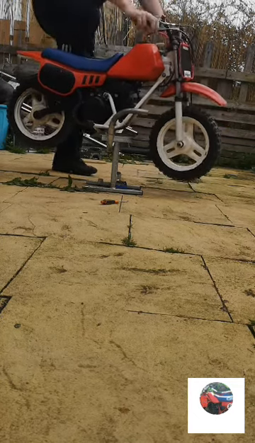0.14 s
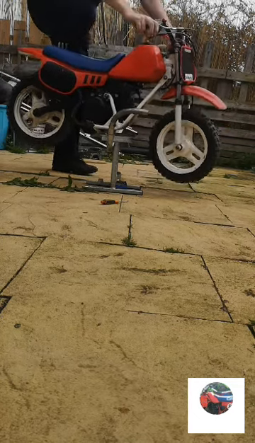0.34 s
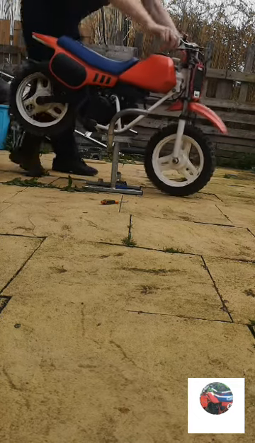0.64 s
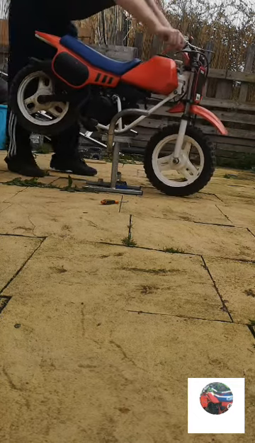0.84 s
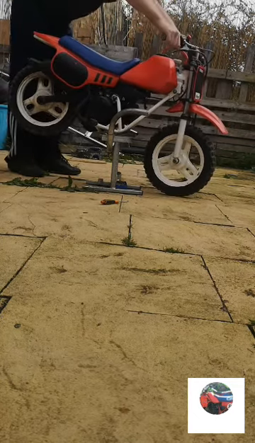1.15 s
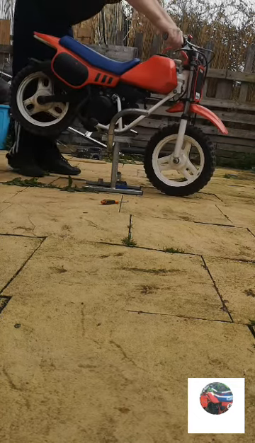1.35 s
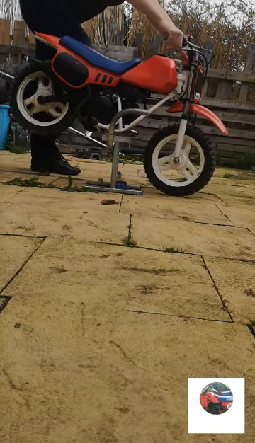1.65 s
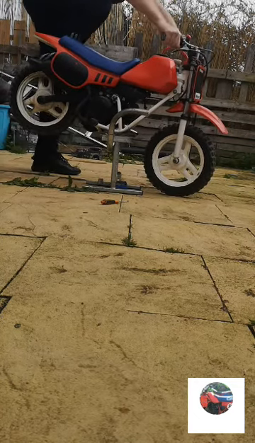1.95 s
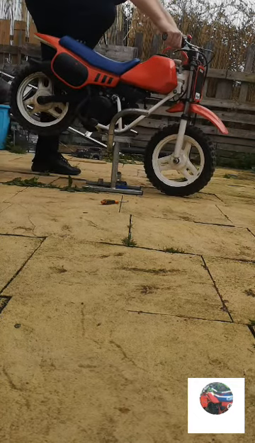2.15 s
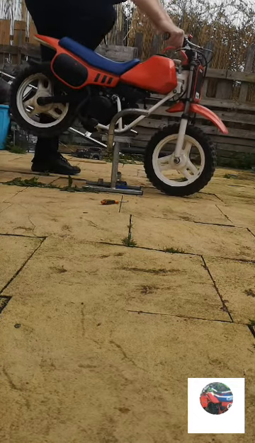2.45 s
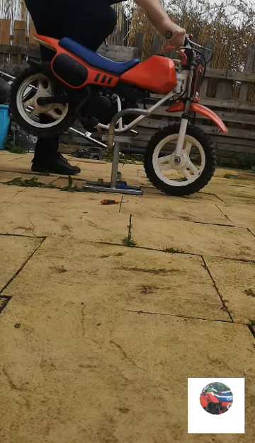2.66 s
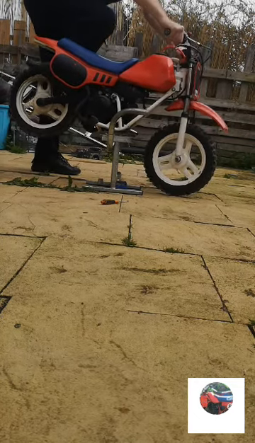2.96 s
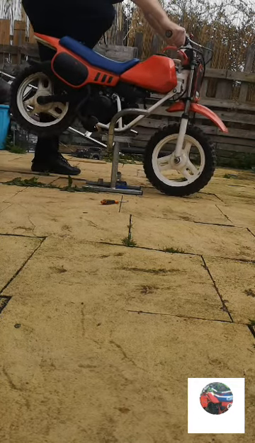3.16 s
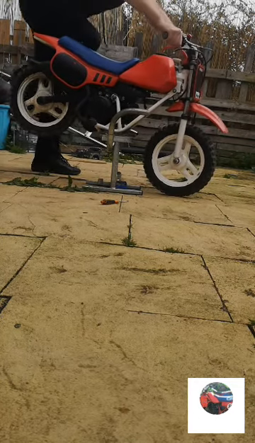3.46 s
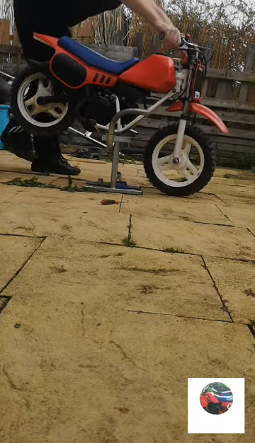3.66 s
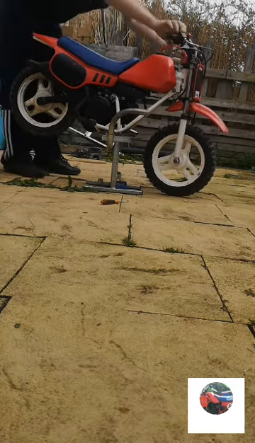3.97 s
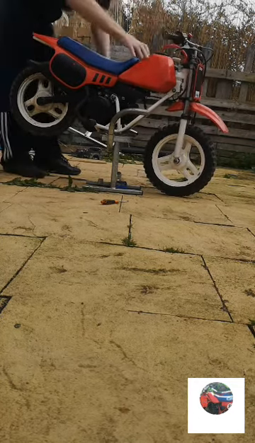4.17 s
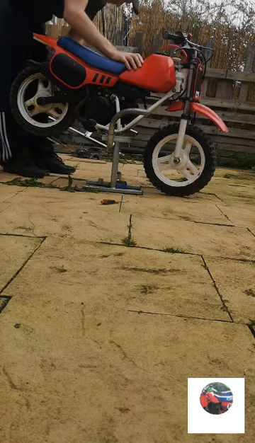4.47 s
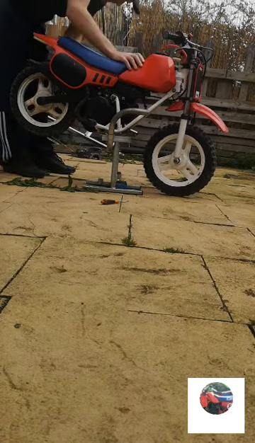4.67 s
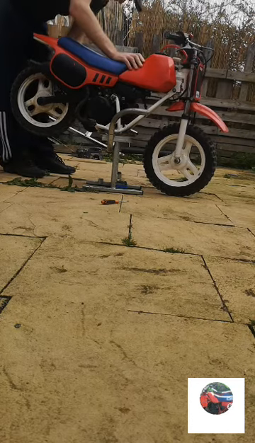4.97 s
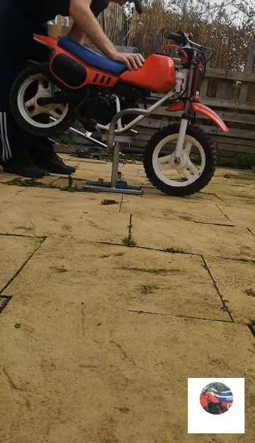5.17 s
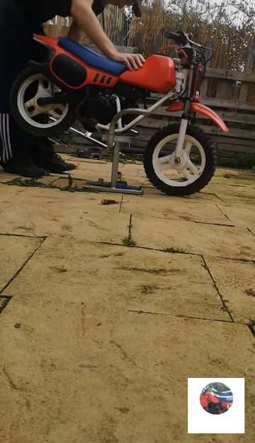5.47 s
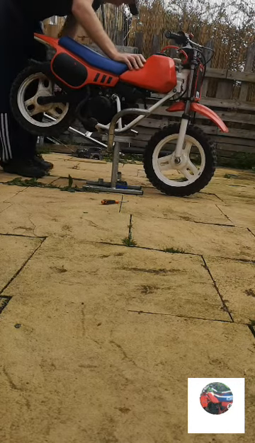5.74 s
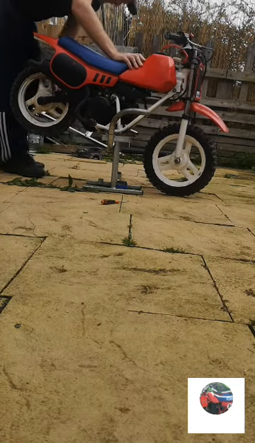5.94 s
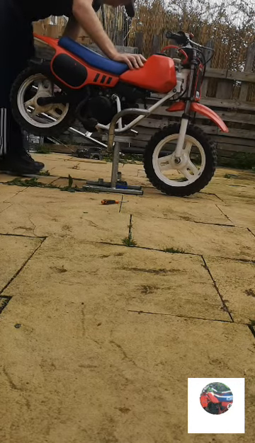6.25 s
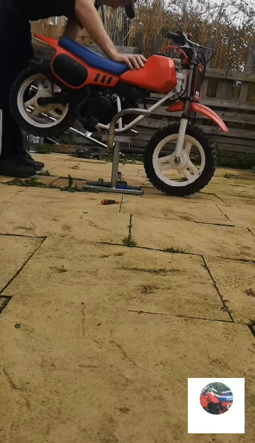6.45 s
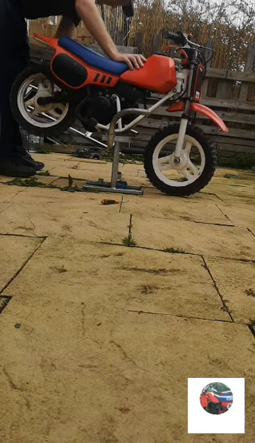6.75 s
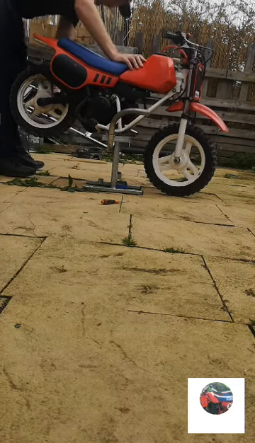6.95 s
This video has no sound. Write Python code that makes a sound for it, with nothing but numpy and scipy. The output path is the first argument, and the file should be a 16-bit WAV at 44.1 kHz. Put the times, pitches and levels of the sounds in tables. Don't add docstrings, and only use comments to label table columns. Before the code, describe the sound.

Two sharp steel clanks within the first second, the second leading into a dull thud and quick loose chatter as the front wheel lands. Then mostly calm: gritty shoe scuffs, tiny lever ticks, soft twittering from the left, far short yaps, low traffic and a faint distant engine hum. The song swells past five seconds to a thin falling whistle, with bright panel knocks near it and at the end. Close phone microphone, short echoes from fence and walls.

```python
import sys
import numpy as np
from scipy import signal
from scipy.fft import rfft, irfft, next_fast_len
from scipy.io import wavfile
from scipy.ndimage import uniform_filter1d

SR = 44100
rng = np.random.default_rng(int(sys.argv[2]) if len(sys.argv) > 2 else 0)


def unload_audio(sound):
    columns = np.transpose(np.atleast_2d(sound))
    steps = np.round(np.clip(columns, -1, 1) * 32767)
    wavfile.write(sys.argv[1], SR, steps.astype(np.int16))


def rack_gain(trim_db):
    fader = np.asarray(trim_db, float)
    return 10 ** (fader / 20)


N = 313551

# hz, level_db
FAR_PORTS = [(250, 0), (550, 1.7), (5000, 0.75), (15000, 0.5)]
# hz, level_db
RUB_COLOUR = [(400, -18.5), (750, -5), (1500, -2.5), (2250, -0.5), (2700, -1.5), (3100, -7), (5300, -5),
              (7600, -2), (9000, -11), (15000, -23.5)]


def evened(x):
    return x / np.sqrt(np.mean(x ** 2) + 1e-20)


def read(points, hz):
    f, value = np.transpose(points)
    return np.interp(np.log(hz + 1), np.log(f + 1), value)


def add(mix, s, sound):
    part = mix[round(s * SR):][:len(sound)]
    part += sound[:len(part)]


def coloured(x, gain):
    size = next_fast_len(x.shape[-1])
    spectrum = rfft(x, size) * gain(np.fft.rfftfreq(size, 1 / SR))
    return irfft(spectrum, size)[..., :x.shape[-1]]


def from_left(hz):
    # hz, left_lead_rad
    bass_phase = [(200, 1.5), (300, 1.3), (520, 3.5), (800, -2)]
    left_lead_s = 28 / SR
    return np.where(hz < 800, read(bass_phase, hz), 2 * np.pi * hz * left_lead_s)


def yard(x, wet_db, stretch, balance_db, lead):
    # hz, t60_s
    yard_t60 = [(300, 0.35), (1500, 0.22), (5000, 0.19), (10000, 0.19), (16000, 0.033)]
    taps = np.zeros((2, SR))
    at = np.arange(200, SR - 20, 20) + rng.integers(0, 20, (2, (SR - 201) // 20))
    np.put_along_axis(taps, at, rng.choice([-1., 1.], at.shape), 1)
    hz, t, z = signal.stft(taps, SR, nperseg=256)
    decay = rack_gain(-60 * t / (stretch * read(yard_t60, hz)[:, None]))
    tail = signal.istft(z * decay, SR, nperseg=256)[1]
    echoes = signal.fftconvolve(x[None], tail / np.linalg.norm(tail[0]), axes=1)[:, :N]
    direct = np.array([x, coloured(x, lambda f: np.exp(-1j * lead(f)))])
    both = direct + rack_gain(wet_db) * echoes
    return coloured(both, lambda f: rack_gain(np.outer([.5, -.5], balance_db(f))))


def town():
    # hz, level_db_per_hz
    town_colour = [(12, -38), (20, -6), (70, -2), (134, -14), (193, -16), (270, -28), (399, -29),
                   (499, -32), (642, -40), (850, -36), (2300, -37.5), (3300, -42), (6010, -47),
                   (7310, -45.5), (7950, -51.5), (14700, -56), (16000, -62)]
    # time_s, level_db
    rumble = [(0.0, -59.5), (0.59, -58.5), (0.81, -58.5), (1.88, -61.5), (2.73, -60), (3.21, -61.5),
              (4.14, -58.5), (5.29, -60), (7.11, -58)]
    # hz, likeness_0_to_1
    town_same = [(60, 0.94), (200, 0.93), (380, 0.94), (1000, 0.21), (4000, 0.067), (9000, 0.22)]
    frames, hz = N // 256 + 5, np.fft.rfftfreq(1024, 1 / SR)
    a, b, c, d, patches = rng.standard_normal((frames, 513, 5)).T
    patches = evened(uniform_filter1d(uniform_filter1d(patches, 12, 0), 14, 1))
    s, db = np.transpose(rumble)
    swell_db = np.interp((np.arange(frames) * 256) / SR, s, db - db.mean())
    swell_db = swell_db / (1 + (hz[:, None] / 300) ** 4)
    same = np.clip(read(town_same, hz), -1, 1)[:, None]
    left = a + 1j * b
    shared = same * left * np.exp(-1j * from_left(hz))[:, None]
    right = shared + np.sqrt(1 - same ** 2) * (c + 1j * d)
    z = np.array([left, right]) * rack_gain(read(town_colour, hz)[:, None] + 0.97 * patches + swell_db)
    z *= rack_gain(np.outer([.5, -.5], read(FAR_PORTS, hz)))[:, :, None]
    air = signal.istft(z, nperseg=1024, noverlap=768)[1][:, :N]
    return rack_gain(-56.5 + 2.0) * evened(air)


def far_engine():
    # time_s, level_db
    approach = [(0, -77.5), (3.8, -78.5), (4.601, -67.5), (6.3, -72.5), (7.11, -70.5)]
    hum = coloured(rng.standard_normal(N), lambda f: 1 / (1 + ((f - 192) / 14) ** 2))
    return rack_gain(np.interp(np.arange(N) / SR, *np.transpose(approach))) * evened(hum)


def jackdaws():
    # start_s, length_s, first_pitch_hz, last_pitch_hz, level_db
    yaps = [(0.953, 0.043, 1060, 1019, -64.5), (1.758, 0.078, 857, 850, -77.5),
            (1.944, 0.053, 1087, 982, -71.5), (2.922, .06, 1075, 983, -63.5),
            (3.1, 0.063, 1030, 1010, -81.5), (3.88, 0.114, 1019, 990, -72.5), (4.075, 0.068, 975, 895, -76),
            (4.498, 0.069, 1110, 1017, -69.5), (5.344, 0.025, 987, 1010, -69.5),
            (5.609, 0.051, 1170, 964, -53.5), (5.69, 0.046, 1060, 1020, -69.5),
            (5.967, 0.047, 724, 703, -70.5), (6.051, 0.024, 772, 730, -70), (6.406, 0.0515, 1130, 995, -66),
            (6.9, 0.067, 978, 907, -75)]
    partials_db = [-14.5, 4.5, -14.5, -24]
    flutter_hz, flutter_depth = 190, 0.57
    out = np.zeros(N)
    for s, length, first_hz, last_hz, db in yaps:
        u = np.linspace(0, 1, round(length * SR))
        wobble = .038 * evened(uniform_filter1d(rng.standard_normal(len(u)), 120))
        pitch = (first_hz + (last_hz - first_hz) * u) * (1 + wobble)
        turn = 2 * np.pi * np.cumsum(pitch) / SR
        voice = sum(rack_gain(d) * np.sin((k + 1) * turn) for k, d in enumerate(partials_db))
        flutter = 1 + flutter_depth * np.sin(2 * np.pi * flutter_hz * u * length)
        add(out, s, rack_gain(db) * voice * flutter * np.sin(np.pi * u ** 0.55))
    return out


def bird_strokes():
    syllables = { "low": [(0.0017, 0.0206, 3154, 3700, 0.5)],
                 "middle": [(0.0011, 0.0246, 3710, 4275, -1.5)], "peep": [(0.002, 0.023, 4610, 5240, -1)],
                 "dip": [(0.002, 0.035, 2700, 2900, 3)], "pair": [(0, 0.0273, 5400, 6180, -4.5),
                 (.005, 0.0296, 4500, 5230, -4)], "high": [(.003, .011, 5340, 7640, -8),
                 (.008, 0.012, 6980, 8120, -4.5), (.023, .024, 7330, 8150, -1)],
                 "double": [(.002, 0.0127, 3600, 4500, -5), (.007, 0.0254, 4174, 5280, 0.5),
                 (.029, .024, 4100, 5150, -0.5), (.05, 0.013, 4400, 5500, -15)],
                 "fork": [(0, 0.022, 3400, 3900, -12), (.019, 0.033, 3350, 4050, -8.5),
                 (0.033, 0.047, 3600, 4750, -13), (0.027, 0.024, 5030, 5400, -2.5),
                 (.047, 0.0286, 5350, 6000, -2.5)], }
    singles = { "low": [(1.273, -79.5, .97), (1.501, -70.5, 1), (3.349, -66.5, 1), (4.481, -60.5, 0.99),
               (4.605, -67.5, 0.92), (4.758, -64, 1), (4.968, -59.5, 1.01)], "middle": [(1.342, -65, 0.94),
               (1.584, -68, 0.96), (3.95, -58, 0.99), (4.832, -55, 1.02)], "peep": [(3.278, -77.5, .97),
               (3.408, -72, 0.97), (3.868, -69.5, 1.04), (4.408, -64.5, 1.01), (4.546, -58.5, 1.05)],
               "dip": [(2.066, -73.5, 1.0), (5.324, -66.5, 1.0)], }
    figures = { "pair": [(1.398, -69, 0.93), (1.64, -69, 0.91), (4.88, -54.5, 1.01)],
               "high": [(1.768, -78.5, 1.01), (1.89, -74, 0.98), (2.109, -67, 0.98), (5.012, -51.5, 0.99),
               (5.139, -56, .96), (5.373, -53.5, 0.98)], "double": [(1.823, -64.5, 0.96),
               (2.172, -63, 0.97), (5.071, -56, .99), (5.432, -48, 0.99)], "fork": [(5.216, -51, 1)], }
    # start_s, length_s, first_hz, last_hz, level_db
    seeps = [(0.001, 0.044, 6900, 7830, -77), (0.32, 0.026, 6100, 6260, -74.5),
             (1.045, 0.032, 3370, 3600, -68), (1.17, 0.0383, 3300, 3300, -74),
             (1.275, .02, 3400, 3760, -71), (1.714, .03, 2800, 3660, -67), (1.988, .045, 3400, 4750, -73),
             (1.994, .03, 5050, 5710, -61), (2.029, .035, 5800, 5500, -72), (2.276, 0.029, 5400, 4880, -69),
             (3.72, 0.075, 7550, 7300, -78), (4, 0.025, 7300, 7800, -73.5), (4.5, 0.033, 5200, 5600, -74),
             (4.526, 0.1, 6670, 6740, -76), (4.645, 0.025, 7250, 7600, -70), (4.772, 0.1, 6900, 6600, -79),
             (5.335, 0.1, 3500, 4150, -72), (5.506, 0.013, 5450, 8100, -59),
             (5.509, 0.063, 3020, 3400, -68), (5.513, 0.012, 5340, 8000, -63),
             (5.562, 0.016, 5030, 4900, -50.5), (5.612, 0.043, 4600, 4805, -50.5)]
    bend = 0.75
    strokes = []
    for name, sung in {**singles, **figures}.items():
        for s, db, factor in sung:
            for delay, length, first_hz, last_hz, part_db in syllables[name]:
                strokes.append((s + delay, length, factor * first_hz, factor * last_hz, db + part_db))
    out = np.zeros(N)
    for s, length, first_hz, last_hz, db in strokes + seeps:
        u = np.linspace(0, 1, round(length * SR))
        pitch = first_hz + (last_hz - first_hz) * u ** bend
        breath = np.convolve(rng.standard_normal(SR // 4), np.hanning(90), "same")
        hoarse = 1 + 0.41 * evened(breath)[:len(u)]
        tone = np.sin(np.pi * u) ** 1.02 * np.sin(2 * np.pi * np.cumsum(pitch) / SR)
        add(out, max(s, 0), rack_gain(db - 2.5) * hoarse * tone)
    twigs = rng.standard_normal(1500) * rack_gain(-60 * np.arange(1500) / SR / 0.031)
    return out + rack_gain(-3.2) * signal.oaconvolve(out, twigs / np.linalg.norm(twigs))[:N]


def bird_whistles():
    # start_s, peak_db, first_hz, settled_hz, glide_s
    whistles = [
        (2.285, -57.5, 5320, 4707, 0.026),
        (5.526, -41, 5413, 4563, 0.055),
    ]
    swell_s, swell_db, fade_db_per_s, waver_depth = 0.071, 19.5, 370, 0.4
    out, t = np.zeros(N), np.arange(SR // 4) / SR
    for s, db, first_hz, settled_hz, glide in whistles:
        pitch = settled_hz + (first_hz - settled_hz) * np.exp(-t / glide)
        turn = 2 * np.pi * np.cumsum(pitch) / SR
        under_db = np.maximum(swell_db * (1 - t / swell_s), fade_db_per_s * (t - swell_s))
        breath = np.convolve(rng.standard_normal(len(t)), np.hanning(500), "same")
        waver = 1 + waver_depth * evened(breath)
        add(out, s, rack_gain(db - under_db) * waver * np.minimum(t / 0.002, 1) * np.sin(turn))
    return out


def ticks():
    # start_s, peak_db, centre_hz
    clicks = [(0.3536, -75, 7870), (0.394, -61, 7900), (0.398, -72, 4100), (0.4, -69, 7300),
              (1.535, -74, 6000), (2.9063, -67.5, 5780), (3.034, -76.5, 6240), (3.254, -75, 7580),
              (4.427, -71, 5850), (4.43, -72, 7540), (4.7375, -75, 3470), (4.8375, -64, 7550),
              (4.838, -68, 5000), (6.2, -75, 8000), (6.2644, -68, 4600), (6.265, -68, 7400)]
    width_hz, t60_s = 1700, 0.03
    out, t = np.zeros(N), np.arange(4096) / SR
    for s, db, hz in clicks:
        band = coloured(rng.standard_normal(len(t)), lambda f: np.exp(-((f - hz) / width_hz) ** 2))
        add(out, s, rack_gain(db + 3 - 60 * t / t60_s) * evened(band))
    return out


def scuffs():
    # peak_s, rise_20db_s, fall_20db_s, peak_db, treble_db
    rubs = [(0.111, 0.02, 0.1, -68, -9), (0.152, 0.1, 0.035, -67, -11), (.866, 0.06, 0.03, -58, -13),
            (.896, 0.4, 0.01, -60, -13), (0.927, 0.07, 0.05, -59, -18), (.98, 0.05, 0.18, -76, -4),
            (1.2105, .004, .06, -55, -6), (1.228, 0.03, 0.0052, -63.5, -2),
            (1.238, -0.07, 0.0539, -58.5, -24), (1.537, -0.05, 0.12, -73, -13),
            (4.369, 0.01, .9, -82.5, -4), (4.41, -0.1, .5, -85, -0.5), (4.521, 0.5, .16, -76.5, -14),
            (4.556, 0.06, .06, -67, -11), (5.83, 2, .4, -91.5, -6), (5.99, 0.76, .2, -79, -5.5),
            (6.02, .1, .12, -80, 1.5), (6.266, .004, .12, -76, -1.5)]
    grain_size = np.minimum(rng.exponential(1, N // 40 + 1), 4).repeat(40)[:N]
    grit = rng.standard_normal(N) * rack_gain(3.04 * grain_size)
    low_share = lambda f: 1 / (1 + (f / 3300) ** 8)
    dull = evened(coloured(grit, lambda f: rack_gain(read(RUB_COLOUR, f)) * low_share(f)))
    bright = evened(coloured(grit, lambda f: rack_gain(read(RUB_COLOUR, f)) * (1 - low_share(f))))
    out = np.zeros(N)
    for s, rise, fall, db, treble_db in rubs:
        rise, fall = max(rise, .003), max(fall, .003)
        at = np.arange(max(round((s - 2 * rise) * SR), 0), round((s + 2 * fall) * SR))
        under = np.maximum((s - at / SR) / rise, (at / SR - s) / fall)
        out[at] += rack_gain(db - 20 * under) * (dull[at] + rack_gain(treble_db + 7.5) * bright[at])
    return out


def tyre():
    # start_s, level_db, pitch_hz, t60_s
    thumps = [
        (.245, -58, 300, 0.028),
        (0.847, -31, 81, 0.064),
        (0.86, -36, 60, 0.067),
        (0.891, -36.5, 129, 0.059),
        (0.92, -43.5, 97.3, 0.082),
    ]
    out, t = np.zeros(N), np.arange(SR // 4) / SR
    for s, db, hz, t60 in thumps:
        push = np.sin(2 * np.pi * hz * t * (1 + .5 * np.exp(-t / 0.041)))
        add(out, s, rack_gain(db - 60 * t / t60) * push * np.minimum(t / 0.0018, 1))
    return out


def struck(hits, modes, dense, dense_db, dense_t60, crack_db, crack_t60, longest, rattle, steady):
    rise_cycles = 4.0
    out, t = np.zeros(N), np.arange(SR // 3) / SR
    hz, db, t60 = np.transpose(modes)[:, :, None]
    ripple_db = 2.0 * evened(uniform_filter1d(rng.standard_normal(len(t) // 2 + 1), 30))
    for s, peak_db, ring, tilt_db in hits:
        strike = 1.4 * rng.standard_normal(hz.shape)
        fall_db = 60 * t / (np.minimum(t60, longest) * ring)
        level_db = db + strike + tilt_db * np.log2(hz / 3000) - fall_db
        shake = steady + rattle * evened(uniform_filter1d(rng.standard_normal(level_db.shape), 250))
        tones = np.sin(2 * np.pi * (hz * t + rng.random(hz.shape)))
        clear = (rack_gain(level_db) * (1 - np.exp(-hz * t / rise_cycles)) * shake * tones).sum(0)
        mass = coloured(rng.standard_normal(len(t)),
                        lambda f: rack_gain(read(dense, f) + ripple_db + tilt_db * np.log2((f + 300) / 3000)))
        dying = rack_gain(dense_db - 60 * t / (dense_t60 * ring)) + rack_gain(crack_db - 60 * t / crack_t60)
        sound = clear / np.std(clear[:400]) + evened(mass) * dying
        sound *= np.minimum(t / 0.00068, 1) * np.cos(1.5 * np.pi * t)
        add(out, s, rack_gain(peak_db) * sound / abs(sound).max())
    return out


def frame_knocks():
    # start_s, peak_db, ring_factor, tilt_db_per_octave
    knocks = [(1.211, -60, 0.86, 5), (1.232, -56, 0.41, -5), (1.299, -57.5, 0.54, -10),
              (4.731, -56, 0.6, -7), (5.447, -36, 0.7, 8.5), (6.125, -59.5, 0.65, 2),
              (6.499, -43, 0.84, -1.5), (6.779, -59.5, 0.77, -23), (6.832, -60, 0.9, -9.5),
              (6.951, -56.5, 1.1, 1.5), (7.033, -36, 0.67, 6.5)]
    # pitch_hz, level_db, t60_s
    frame_modes = [(1336, -14, 0.04), (1450, 13, 0.088), (1706, -29, 0.054), (1960, 20.5, 0.13),
                   (2680, 20.5, 0.11), (3000, -84, 0.08), (3780, 10, 0.08), (4100, 26, 0.044),
                   (6200, -1, 0.078)]
    # hz, level_db_per_hz
    blow = [(500, -69), (850, -32), (1570, 6), (2300, -12.5), (4150, -19), (8030, -43), (8740, -40),
            (9620, -49), (15000, -72)]
    return struck(knocks, frame_modes, blow, dense_db=1.5, dense_t60=0.23, crack_db=2.0, crack_t60=0.023,
                  longest=.25, rattle=0.69, steady=0.39)


def wheel_bounce():
    # start_s, peak_db, ring_factor, tilt_db_per_octave
    touches = [
        (0.8477, -33, 0.45, -1),
        (0.856, -42, 0.44, 0),
        (0.8635, -41, 0.33, 1),
        (0.868, -42, 0.5, 1.8),
        (0.878, -46, 0.48, 0),
    ]
    # pitch_hz, level_db, t60_s
    wheel_modes = [(614, -8, 0.053), (1405, 2, .06), (1750, -7, .06), (2101, -0.5, 0.069), (2602, -3, .07),
                   (3400, -7, .06)]
    return struck(touches, wheel_modes, RUB_COLOUR, dense_db=-1.5, dense_t60=0.08, crack_db=4.0,
                  crack_t60=0.0048, longest=.25, rattle=0.66, steady=0.37)


def fork_landing():
    # start_s, peak_db, ring_factor, tilt_db_per_octave
    rattles = [
        (0.243, -60, 0.29, -3),
        (0.7815, -37, 0.6, 0.5),
        (0.8915, -36, 0.4, 1.5),
        (0.895, -33, 0.4, 0),
        (0.899, -34, 0.4, -2),
        (0.9035, -37, 0.4, 1),
        (0.907, -40, 0.3, -3),
        (0.914, -46.5, 0.2, -1.5),
        (0.921, -44, 0.18, 0),
        (0.934, -50, 0.38, -6),
    ]
    # pitch_hz, level_db, t60_s
    fork_modes = [(596.6, -6, 0.048), (1130, -5, 0.074), (1296, 2, 0.16), (1366, 0, 0.14),
                  (1859, -5.5, 0.077), (2080, -4.5, 0.1), (2563, -7, 0.1), (3845, -10.5, 0.071)]
    return struck(rattles, fork_modes, RUB_COLOUR, dense_db=-1.5, dense_t60=0.08, crack_db=4.0,
                  crack_t60=0.0056, longest=.25, rattle=0.88, steady=0.26)


def stand():
    # start_s, peak_db, ring_factor, tilt_db_per_octave
    clanks = [
        (0.465, -35.5, 4.1, 1),
        (0.4998, -11, 0.72, 0),
        (0.5015, -12, 0.15, -1),
    ]
    # start_s, peak_db, ring_factor, tilt_db_per_octave
    rebounds = [
        (0.7275, -52, 2.6, 0),
        (0.7735, -46, 0.58, 1.5),
        (0.7805, -28, 0.5, 0),
        (0.7822, -19.5, 0.61, 0),
        (0.8609, -55.5, 0.67, -12),
        (0.8925, -42, 0.15, 8),
    ]
    stand_hz = [760, 1500, 1720, 2060, 2650, 3480, 4040, 4777, 5158, 5245, 5034, 5628, 6100, 6659, 7194,
                7296, 7408, 8098, 9870, 11300, 840, 14390, 7636, 8893, 2370]
    # first_foot_db, other_foot_db, t60_s
    stand_ring = [(-12, -16, 0.13), (-9, -18, 0.14), (-7, -17, .17), (-18, -8, .12), (-18, -9, .15),
                  (-13, -12, 0.21), (-3.5, -3, 0.086), (-16, -16, .15), (-7, -4, 0.15), (0.5, -0.5, 0.12),
                  (-9, -10, 0.12), (-7, -10, 0.14), (-8, -11.5, .14), (-1.5, -21, 0.12), (-5, -8, 0.075),
                  (-3, -7, 0.095), (-7, -8, 0.22), (-10, -10, .13), (-20, -17.5, .15), (-24, -20.5, 0.18),
                  (-14, -9, 0.1), (-22, -21.5, .13), (-9, -6, .13), (-16, -14, 0.16), (-20, -10, .12)]
    # hz, level_db_per_hz
    crack = [(290, -62.5), (500, -32.5), (795, -10.5), (1050, -29.5), (1570, -9), (2290, -11),
             (3000, -15.5), (3900, -4.5), (4650, -12), (5300, -3), (6500, -3.5), (7600, -7), (10800, -27),
             (14800, -35), (15900, -54.5)]
    first_db, other_db, t60 = np.transpose(stand_ring)
    first = struck(clanks, np.column_stack([stand_hz, first_db, t60]), crack, dense_db=0.6, dense_t60=0.24,
                   crack_db=11.0, crack_t60=0.014, longest=0.31, rattle=.18, steady=.35)
    other = struck(rebounds, np.column_stack([stand_hz, other_db, t60]), crack, dense_db=-1.6, dense_t60=0.22,
                   crack_db=4.0, crack_t60=0.012, longest=0.31, rattle=.15, steady=.4)
    return first + other


def scene():
    # hz, level_db
    frame_ports = [(250, 0.96), (950, 2.3), (2400, 3.4), (6000, 6.4), (15000, 6.45)]
    # hz, left_lead_rad
    frame_phase = [(1000, 0.1), (3450, 0.63), (15800, 4.3)]
    # hz, level_db
    stand_ports = [(250, 2), (2000, 1), (3300, 9), (5500, 6.5), (7500, 6.5), (9200, -7), (12000, -12),
                   (15000, -22)]
    # hz, left_lead_rad
    stand_phase = [(1640, 0.99), (4310, 22), (5250, 18), (7410, 26), (8870, 25.5), (10400, 26.5),
                   (15800, 28)]
    farther = yard(rack_gain(-2.0) * jackdaws(), 0.63, 0.99, lambda f: read(FAR_PORTS, f) + 1.9, from_left)
    song = bird_strokes() + bird_whistles()
    far = yard(song, -8.0, 0.81, lambda f: read(FAR_PORTS, f) + 10.0, from_left)
    bike = scuffs() + tyre() + frame_knocks() + wheel_bounce() + fork_landing()
    near = yard(bike, -6.0, 0.43, lambda f: read(frame_ports, f), lambda f: read(frame_phase, f))
    steel = yard(stand(), -8.0, 0.93, lambda f: read(stand_ports, f), lambda f: read(stand_phase, f))
    left_right = rack_gain([[2.5], [-1.5]])
    return town() + far_engine() + farther + far + left_right * ticks() + near + steel


def low_pass(x):
    return signal.sosfilt(signal.butter(12, 16320, fs=SR, output="sos"), x)


def record(dry):
    dry = coloured(dry, lambda f: 1 / (1 + (f / 15450) ** 80))
    mid, side = (dry[0] + dry[1]) / 2, (dry[0] - dry[1]) / 2
    side = coloured(side, lambda f: 1 - .975 / (1 + (f / 250) ** 4))
    return low_pass(np.array([mid + side, mid - side]))


dry = scene()
out = record(dry)
unload_audio(out)
```